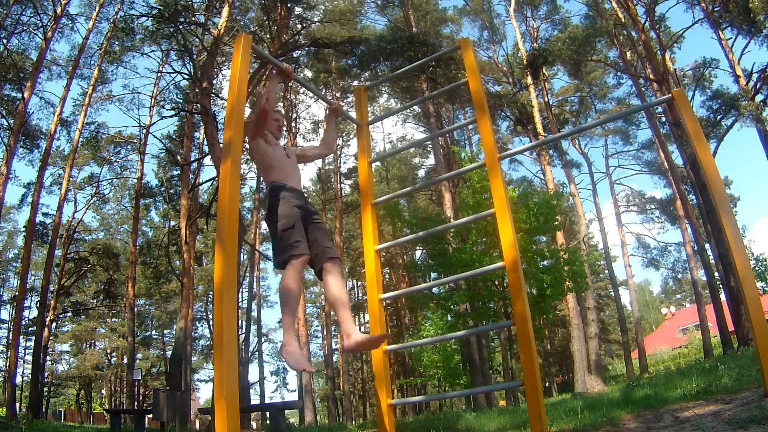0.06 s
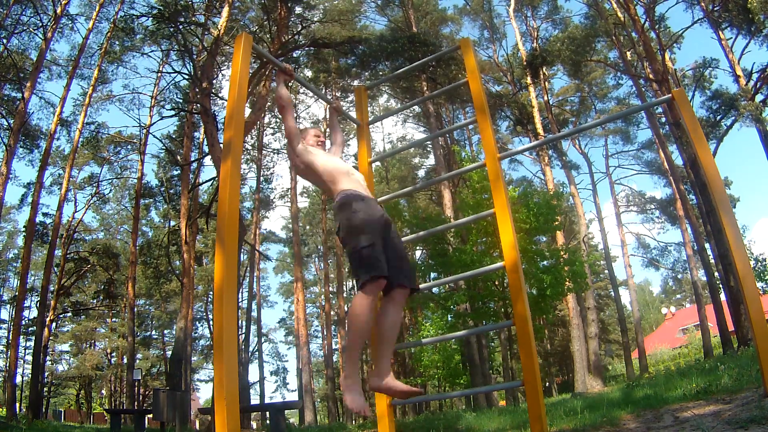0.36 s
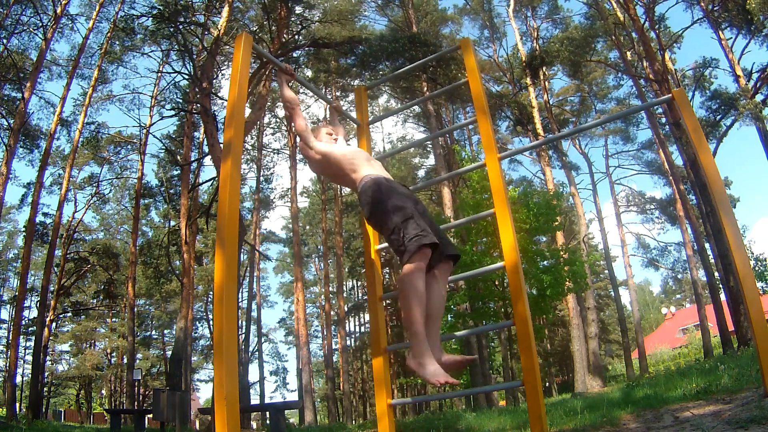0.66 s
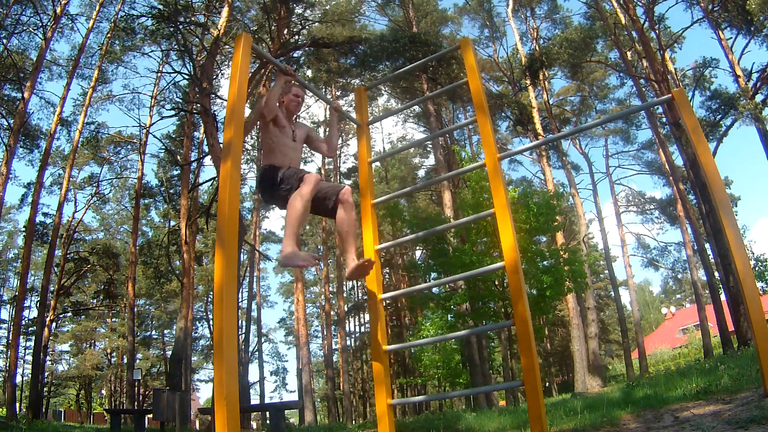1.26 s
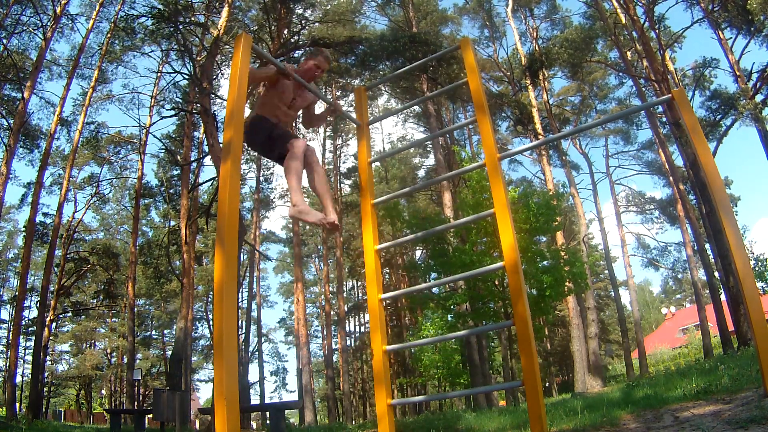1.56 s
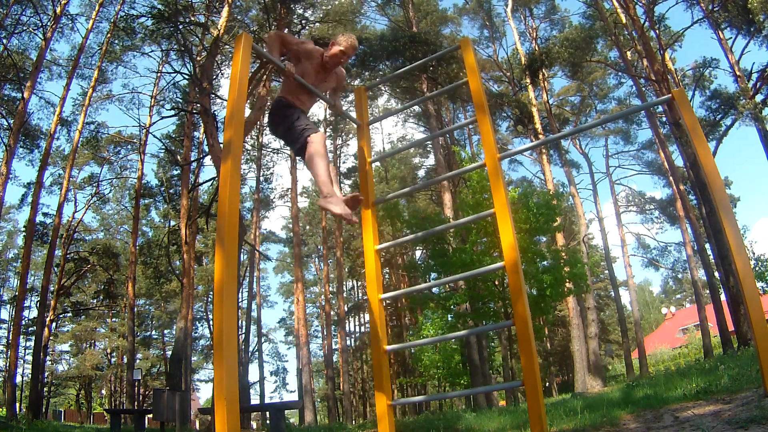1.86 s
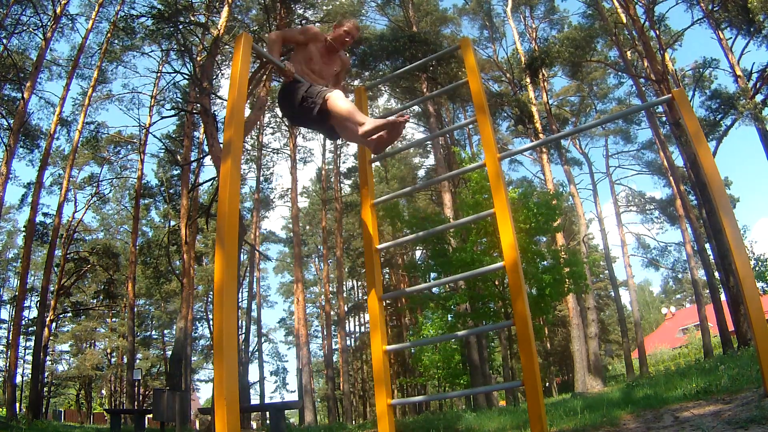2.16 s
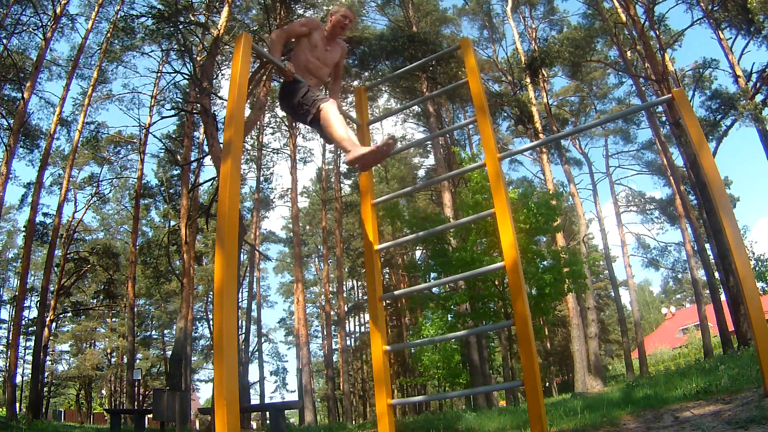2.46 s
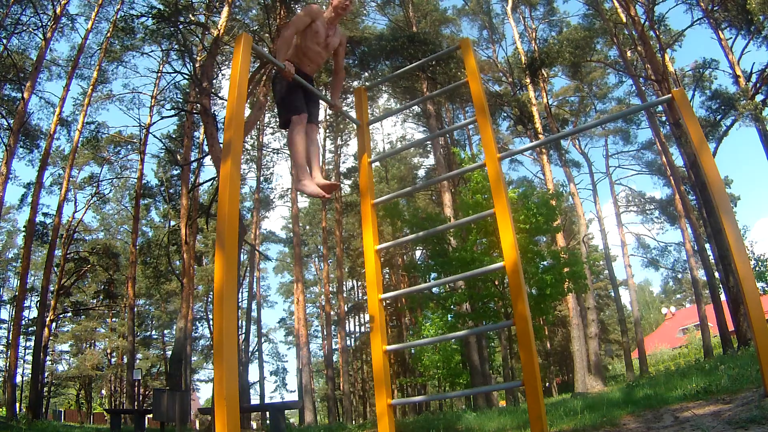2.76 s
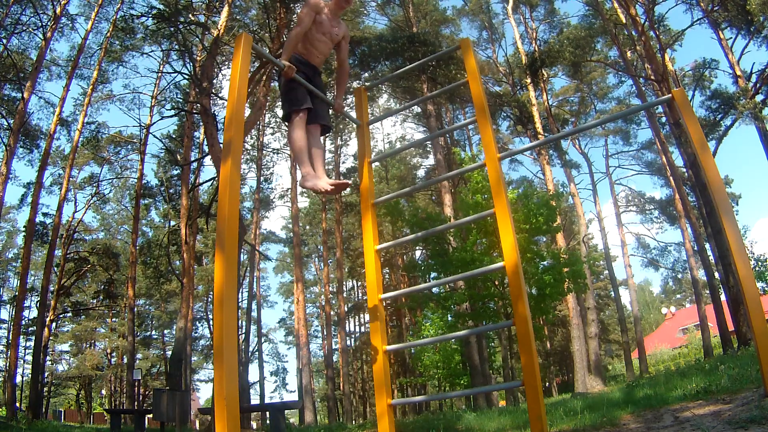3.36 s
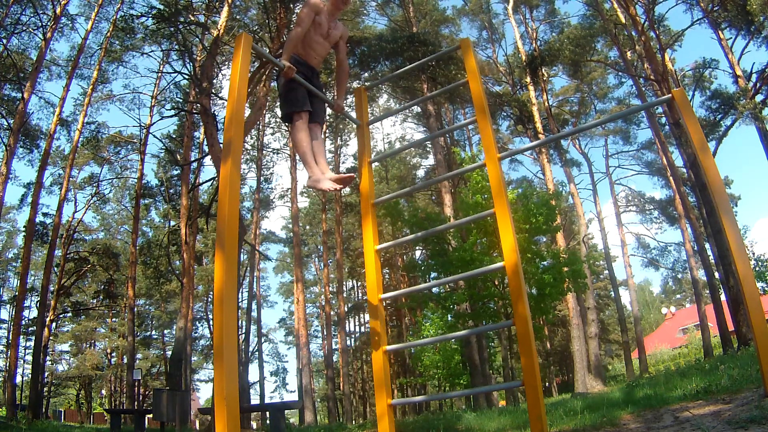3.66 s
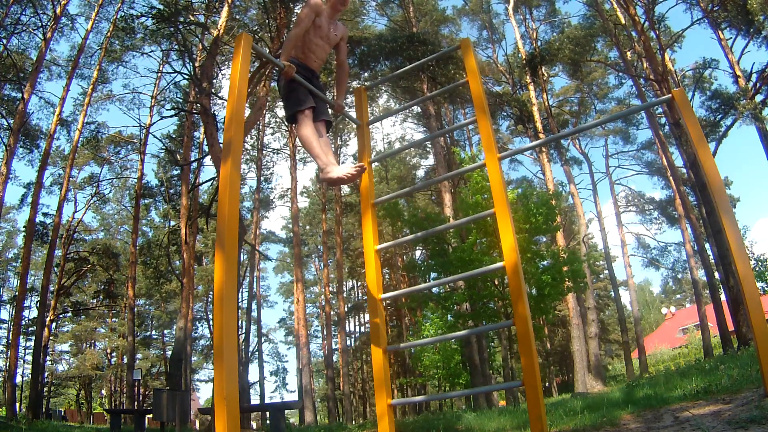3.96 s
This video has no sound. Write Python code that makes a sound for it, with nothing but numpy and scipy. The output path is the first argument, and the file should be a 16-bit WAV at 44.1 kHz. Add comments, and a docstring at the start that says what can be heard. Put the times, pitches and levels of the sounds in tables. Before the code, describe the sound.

Brief ringing clank of a metal exercise bar over softly hushing trees and a faint bird.

```python
"""Trees hush softly in a pine wood, and a far engine and a hum drone from start to end.
After a second, two far chirps are heard. Near two seconds someone swings up over a steel
exercise bar, which knocks in its frame and sets the tubes ringing. Then a finch sings
one falling song: five opening syllables, a quick trill and a closing flourish.
All along, a small camera samples slowly, which mirrors every sound faintly into the treble."""
import sys
import numpy as np
from scipy import signal
from scipy.fft import rfft, irfft
from scipy.io import wavfile
from scipy.ndimage import uniform_filter1d

SR = 44100
rng = np.random.default_rng(int(sys.argv[2]) if len(sys.argv) > 2 else 0)


def to_wav(s):
    """Save 16-bit WAV."""
    ch = np.atleast_2d(s).T  # columns
    pcm = np.round(np.clip(ch, -1, 1) * 32767)  # PCM
    wavfile.write(sys.argv[1], SR, pcm.astype(np.int16))


N = 176400  # 4 seconds


def amp(db):
    """Turns decibels into a number to multiply a sound by."""
    return 10 ** (np.asarray(db) / 20)


def unit(x):
    """Scales a signal so that its average strength (rms) is 1."""
    return x / np.sqrt(np.mean(x ** 2) + 1e-20)


def at_frequency(table, hz):
    """Looks up a table between its rows, on a scale of octaves."""
    row_hz, values = np.transpose(table)
    return np.interp(np.log(hz + 1), np.log(row_hz), values)


def curve(table, column=1):
    """Joins the rows of a time table with straight lines, one value per sample."""
    rows = np.array(table)
    return np.interp(np.arange(N) / SR, rows[:, 0], rows[:, column])


def shaped_noise(gains, length):
    """Noise of strength 1, with each frequency turned up or down by its gain."""
    return unit(irfft(rfft(rng.standard_normal(length)) * gains, length))


def drift(rate_hz):
    """A random wobble, mostly slower than rate_hz."""
    hz = np.fft.rfftfreq(N, 1 / SR)
    return shaped_noise(np.exp(-(hz / rate_hz) ** 2), N)


def tone(hz, db, wander):
    """A pure tone whose pitch wavers by the fraction `wander`."""
    cycles = np.cumsum(hz * (1 + wander * drift(7.8))) / SR + rng.random()
    return np.sqrt(2) * amp(db) * np.sin(2 * np.pi * cycles)


# tone colour of the microphone hiss (frequency [Hz], relative level [dB])
HISS_COLOUR = [(40, 10), (200, -13), (450, 8), (1200, -7), (3500, 8), (5500, 6.5)]


def microphone_hiss(level_db=-72.5):
    """Faint noise, different on the left and the right."""
    colour = amp(at_frequency(HISS_COLOUR, np.fft.rfftfreq(N, 1 / SR)))
    white = rng.standard_normal((2, N))
    return amp(level_db) * unit(irfft(rfft(white) * colour, N))


# how loud the distant hum is (time [s], level [dB])
HUM_LEVELS = [(0, -49.5), (.15, -50.5), (.48, -49), (.75, -62), (1.03, -69), (1.15, -58), (1.8, -57.5),
              (2.13, -51.5), (2.27, -66.5), (3.1, -63.5), (3.3, -57), (3.5, -61), (4, -60.5)]


def distant_hum():
    """A hum that comes and goes, with a wavering tone below it."""
    hum = tone(hz=183.3, db=curve(HUM_LEVELS), wander=0.0031)
    return hum + tone(hz=139.5, db=-61 + 3 * drift(8.2), wander=0.0291)


# tone colour of the trees' hush and the low rumble (frequency [Hz], relative level [dB])
HUSH_COLOUR = [(10, -14), (28, 2.5), (45, 1.5), (65, 1.5), (105, -3.5), (150, -9), (220, -12), (330, -19),
               (550, -23.5), (1000, -27.5), (1900, -33.5), (3100, -36.5), (4400, -42), (5400, -47)]
# how the rumble swells (time [s], level change [dB])
RUMBLE_SWELL = [(0, 0), (.85, -1.5), (.95, 4.5), (1.15, 4.5), (1.35, 3), (2, -0.5), (3.1, -2.5), (3.55, 1),
                (4, -2)]
# how the hush above it swells (time [s], level change [dB])
HUSH_SWELL = [(0, .3), (1, .3), (1.6, -0.2), (2.4, 0.5), (3.1, 1), (3.6, 0.65), (4, 0.5)]


def trees(level_db=-45, patch_db=0.78, rumble_below_hz=130):
    """A soft hush with drifting louder and softer patches, over a rumble that swells."""
    frames = N // 512 + 6  # the noise is built in short, overlapping slices
    t = np.arange(frames)[:, None] * 512 / SR
    hz = np.fft.rfftfreq(2048, 1 / SR)
    real, imaginary, patches = rng.standard_normal((3, frames, len(hz)))
    patches = uniform_filter1d(patches, size=8, axis=0)  # smooth over time
    patches = unit(uniform_filter1d(patches, size=24, axis=1))  # and over frequency
    low_share = 1 / (1 + (hz / rumble_below_hz) ** 4)
    swell_db = low_share * np.interp(t, *np.transpose(RUMBLE_SWELL))
    swell_db += (1 - low_share) * np.interp(t, *np.transpose(HUSH_SWELL))
    gains = amp(at_frequency(HUSH_COLOUR, hz) + patch_db * patches + swell_db)
    slices = (real + 1j * imaginary) * gains
    _, hush = signal.istft(slices.T, nperseg=2048, noverlap=1536)
    return amp(level_db) * unit(hush[:N])


# the engine's two tones (time [s], upper pitch [Hz], upper level [dB], lower level [dB])
ENGINE_TONES = [(0, 93.2, -50.5, -77), (.11, 90.2, -39.5, -50.5), (.3, 85.6, -52.5, -44.5),
                (.58, 93.4, -45.5, -42), (.85, 90.44, -51.5, -45), (.96, 90.4, -38.5, -39),
                (1.14, 95.15, -54, -49.5), (1.27, 92.98, -41.5, -44), (1.6, 94.75, -48.5, -42),
                (2, 91.95, -46.5, -55), (2.4, 94.2, -51, -46), (3.1, 92.66, -49.5, -53),
                (3.35, 92, -48.5, -50.5), (3.65, 93.9, -51, -47.5), (3.8, 96.76, -57, -38.5),
                (4, 94, -54, -47.5)]


def far_engine(flutter_db=1.5, wander=0.01566):
    """Two fluttering tones, at three and two times the engine's base pitch."""
    hz = curve(ENGINE_TONES)
    upper = tone(hz, curve(ENGINE_TONES, column=2) + flutter_db * drift(5.1), wander)
    lower = tone(hz * 2 / 3, curve(ENGINE_TONES, column=3) + flutter_db * drift(9.4), 2 * wander)
    return upper + lower


# how long the wood echoes (frequency [Hz], time to fade by 60 dB [s])
ECHO_FADES = [(300, 1), (2000, 0.52), (6000, 1)]


def trunk_echoes(sound, echoes_per_s=1500, first_echo_s=0.012):
    """Sound bounces back from many trunks; the middle pitches die away first."""
    bounces = rng.standard_normal(SR) * (rng.random(SR) < echoes_per_s / SR)
    bounces *= np.arange(SR) > first_echo_s * SR
    hz, t, slices = signal.stft(bounces, SR, nperseg=256)
    fade = amp(-60 * t / at_frequency(ECHO_FADES, hz)[:, None])
    _, tail = signal.istft(slices * fade, SR, nperseg=256)
    return signal.fftconvolve(sound, tail / np.linalg.norm(tail))[:N]


def whistle(length_s, from_hz, to_hz, db, rasp=0.015):
    """One gliding bird note that swells and fades; quick pitch flutter makes it rasp."""
    progress = np.arange(0, length_s, 1 / SR) / length_s
    flutter = unit(uniform_filter1d(rng.standard_normal(SR // 8), size=40))[:len(progress)]
    glide_hz = from_hz * (to_hz / from_hz) ** (progress ** 0.79)
    cycles = np.cumsum(glide_hz * (1 + rasp * flutter)) / SR
    swell = np.sin(np.pi * progress ** 0.9)
    return amp(db) * swell * np.sin(2 * np.pi * cycles)


# opening syllables, each a rising tick and then a falling note (time [s], falling note's level [dB])
SONG_OPENING = [(2.248, -63.5), (2.385, -64), (2.512, -62.5), (2.636, -61), (2.760, -60.5)]
# quick downward sweeps of the trill (time [s], level [dB])
SONG_TRILL = [(2.857, -62), (2.918, -60), (2.977, -62), (3.036, -64), (3.097, -67), (3.157, -67),
              (3.217, -65), (3.277, -60), (3.337, -54.5), (3.397, -53.5), (3.457, -57.5), (3.518, -60)]
# two far chirps, then the closing flourish
# (time [s], length [s], start pitch [Hz], end pitch [Hz], level [dB], rasp [fraction of pitch])
SINGLE_NOTES = [(1.00, 0.037, 2950, 3160, -66, 0.04), (1.045, 0.033, 3450, 3180, -67, 0),
                (3.617, 0.019, 4750, 4862, -68, 0), (3.640, .018, 3680, 3498, -61, 0),
                (3.665, 0.018, 3130, 3700, -58.5, 0.01), (3.686, 0.017, 3600, 3330, -59, .04),
                (3.701, 0.024, 3175, 2700, -59, 0.1), (3.72, 0.068, 2900, 2490, -63, 0.13),
                (3.945, 0.073, 2750, 3060, -62, 0.05)]


def finch(sink_hz_per_s=328.4):
    """Far chirps, then a whistled song: opening syllables, a sinking trill and a flourish."""
    out = np.zeros(N)
    for start_s, db in SONG_OPENING:
        add(out, start_s, whistle(length_s=0.01707, from_hz=4570, to_hz=5050, db=db - 6))
        add(out, start_s + 0.022, whistle(length_s=0.0393, from_hz=4030, to_hz=3500, db=db))
    for start_s, db in SONG_TRILL:
        sink_hz = sink_hz_per_s * (start_s - SONG_TRILL[0][0])
        sweep = whistle(length_s=0.032, from_hz=4000 - sink_hz, to_hz=2713 - sink_hz / 2, db=db)
        add(out, start_s, sweep)
    for start_s, *note in SINGLE_NOTES:
        add(out, start_s, whistle(*note))
    return out


# knocks of the bar in its sockets (time [s], relative level [dB], rise time [s], extra ring [dB])
BAR_KNOCKS = [(1.8590, -16.5, 0.0061, -1), (1.867, -12.5, 0.0022, 1), (1.880, -21, 0.0022, 0),
              (1.9038, -20, .002, -2), (1.9099, -1.5, .0012, -3.5), (1.9128, 0.5, 0.0015, -2.5),
              (1.9310, -13.5, 0.0018, -2), (1.9745, -6.5, .003, -2), (1.9867, -3.5, 0.0053, -1),
              (2, -11, 0.0026, 1), (2.026, -14, 0.0054, 1), (2.0427, -12, .004, 2), (2.060, -18, .003, 0)]
# tones the steel tubes ring at (pitch [Hz], relative level [dB], time to fade by 60 dB [s])
TUBE_TONES = [(690, -12, .35), (1211, -2, .33), (1750, -3, .45), (1883, 0, .33), (1912, -1, .3),
              (1963, -1, .42), (2293, -6, .3), (2471, -8, .3), (2541, -5, .33), (2697, -7, .3),
              (2954, -6, .25), (3025, -4, .3), (3227, -3, .27), (3384, -4, .27), (3450, -7, .22),
              (4057, -6, .2), (4150, -6, .22), (5077, -7, .24)]
# tone colour of the joint's short clatter (frequency [Hz], relative level [dB])
CLATTER_COLOUR = [(300, -16), (700, -10), (950, -7.5), (1210, 2.5), (1520, -12.5), (1950, 11.5),
                  (2380, -10.5), (2570, 4), (2800, -5), (3050, -0.5), (3380, 5.5), (3650, -12), (4020, 5),
                  (4550, -12.5), (5150, 0), (5600, -13)]


def steel_bar(ring_db=-52.5, split_hz=9, clatter_db=-36, clatter_fade_s=0.073):
    """Each knock rattles the joint and rings the tubes in pairs of close tones that throb."""
    out = np.zeros(N)
    t = np.arange(SR // 2) / SR
    colour = amp(at_frequency(CLATTER_COLOUR, np.fft.rfftfreq(len(t), 1 / SR)))
    pairs = [(hz + side * split_hz * rng.random(), db, fade_s)
             for hz, db, fade_s in TUBE_TONES for side in (-1, 1)]
    for start_s, knock_db, rise_s, extra_ring_db in BAR_KNOCKS:
        rise = 1 - np.exp(-2 * t / rise_s)
        ring = sum(amp(db - 60 * t / fade_s) * np.sin(2 * np.pi * (hz * t + rng.random()))
                   for hz, db, fade_s in pairs)
        clatter = shaped_noise(colour, len(t)) * amp(-60 * t / clatter_fade_s)
        clank = amp(ring_db + extra_ring_db) * ring + amp(clatter_db) * clatter
        add(out, start_s, amp(knock_db) * rise * clank)
    return out


def add(mix, start_s, sound):
    """Adds a sound to the mix at its start time."""
    part = mix[round(start_s * SR):][:len(sound)]
    part += sound[:len(part)]


def scene():
    """Mixes everything; only the microphone hiss differs between left and right."""
    clanks, song = steel_bar(), finch()
    echoes = trunk_echoes(amp(-12.5) * clanks + amp(-7) * song)
    return clanks + song + echoes + trees() + far_engine() + distant_hum() + microphone_hiss()


def record(dry, input_top_hz=5520, sampling_hz=12000, jitter_s=5.5e-6, output_top_hz=15780):
    """The camera cuts the highs, then samples slowly and unevenly, adding a faint treble mirror."""
    hz = np.fft.rfftfreq(N, 1 / SR)
    dulled = rfft(dry) / np.sqrt(1 + (hz / input_top_hz) ** 36)
    slope = irfft(dulled * hz, N)  # bigger where the wave changes fast
    # holding each sample mirrors the sound to both sides of the sampling rate
    carrier = 2 * np.cos(2 * np.pi * sampling_hz * np.arange(N) / SR)
    mirror = rfft(slope * carrier) / np.maximum(hz, sampling_hz / 2)
    timing_noise = 2 * np.pi * jitter_s * slope * rng.standard_normal(N)
    sampled = irfft(dulled + amp(-1) * mirror, N) + timing_noise
    top_cut = signal.firwin(801, output_top_hz, window=("kaiser", 9), fs=SR)
    return signal.oaconvolve(sampled, top_cut[None], "same")


dry = scene()
out = record(dry)
to_wav(out)
```